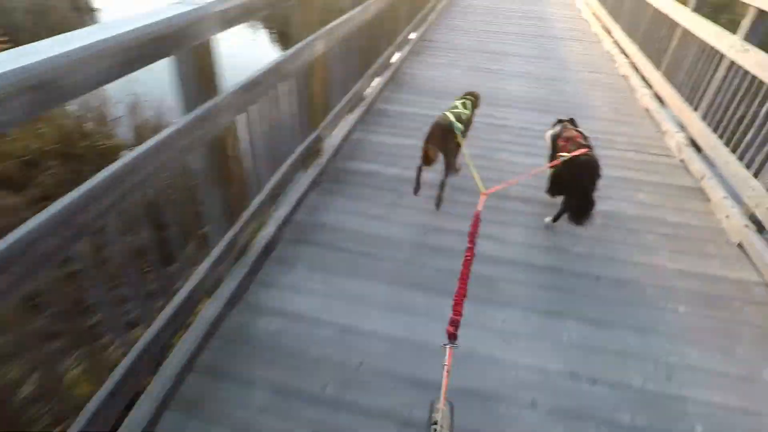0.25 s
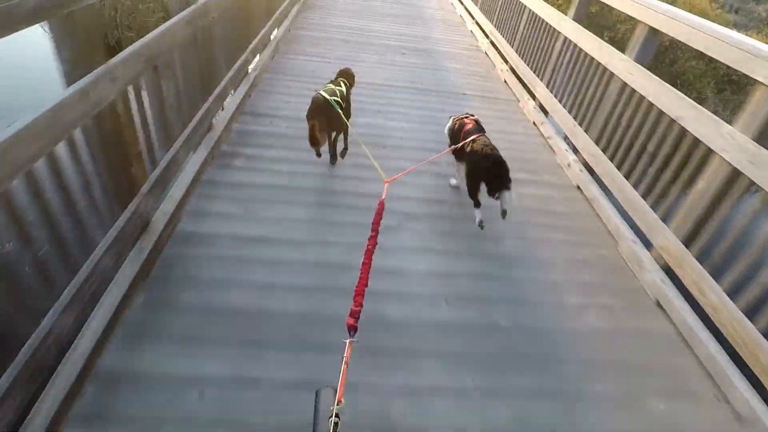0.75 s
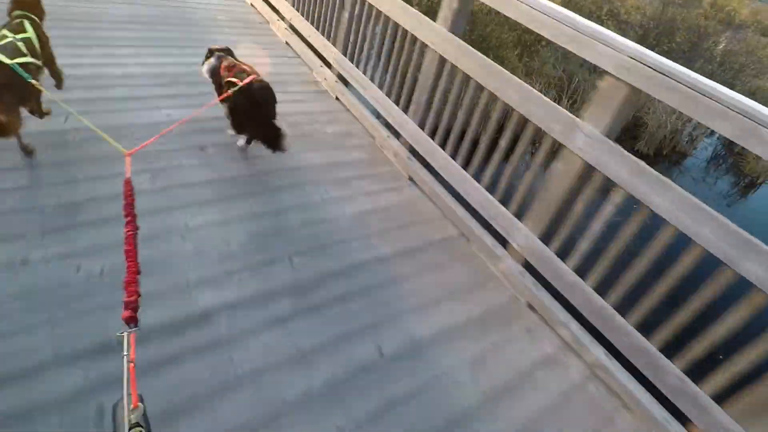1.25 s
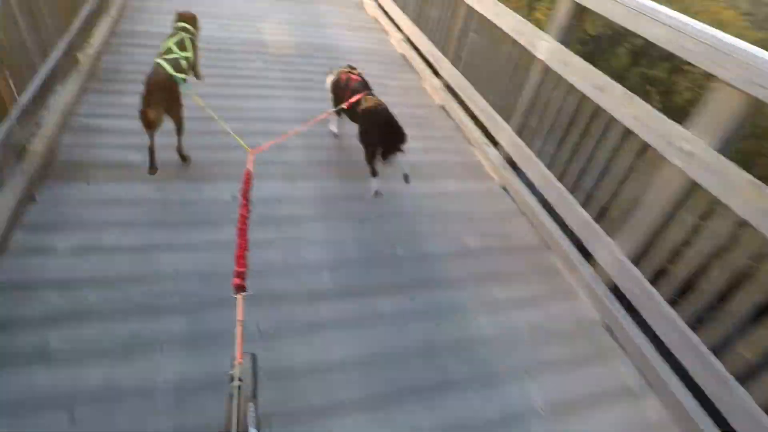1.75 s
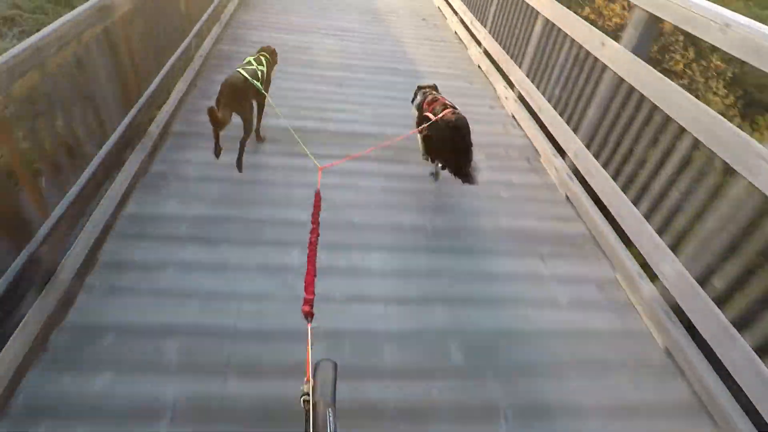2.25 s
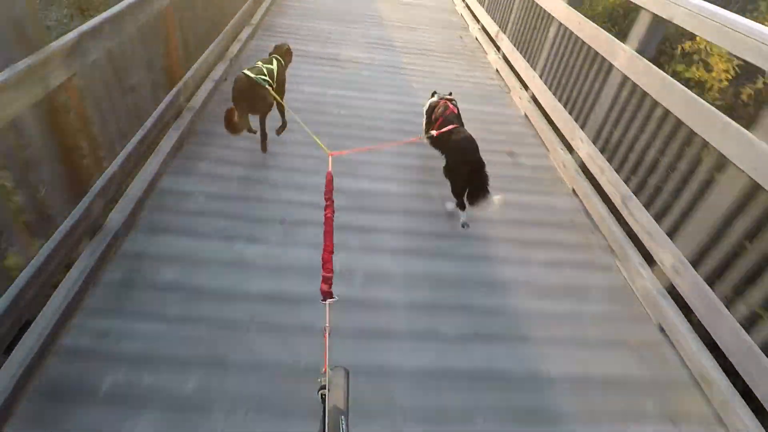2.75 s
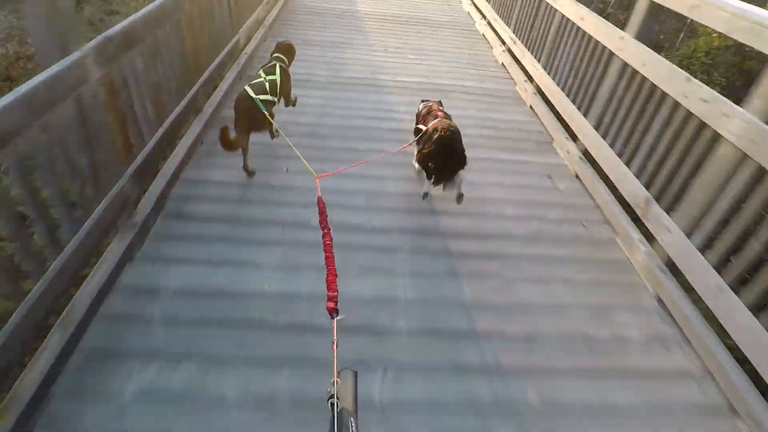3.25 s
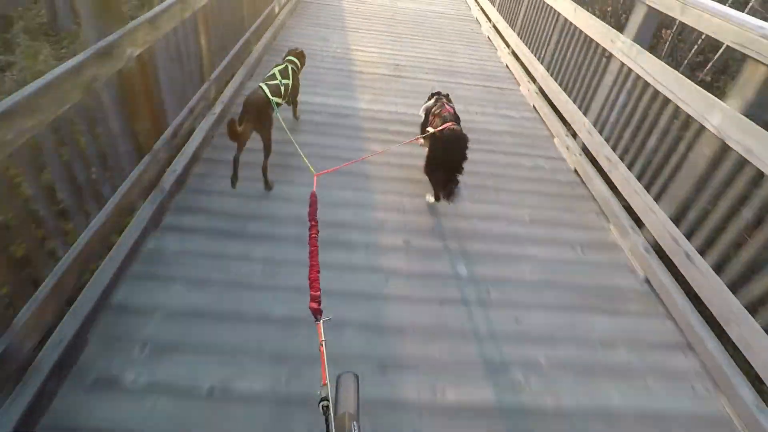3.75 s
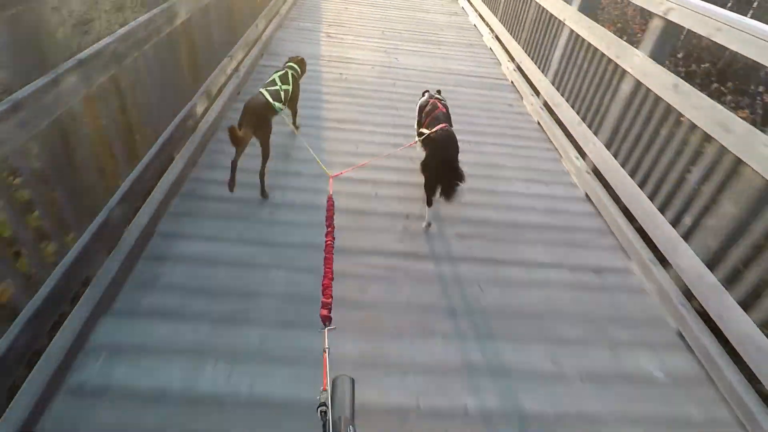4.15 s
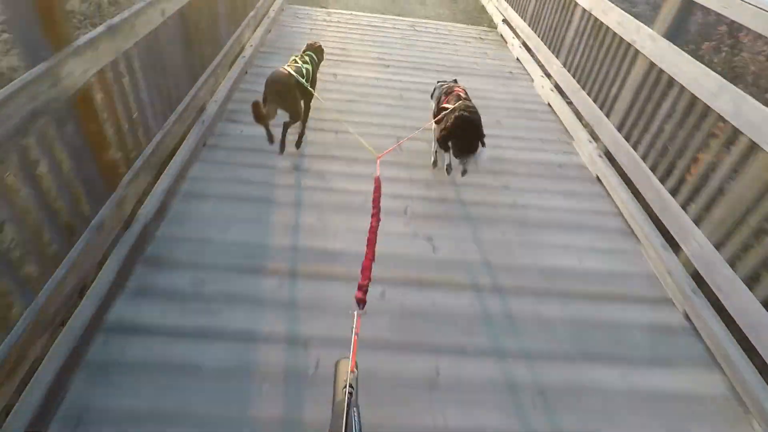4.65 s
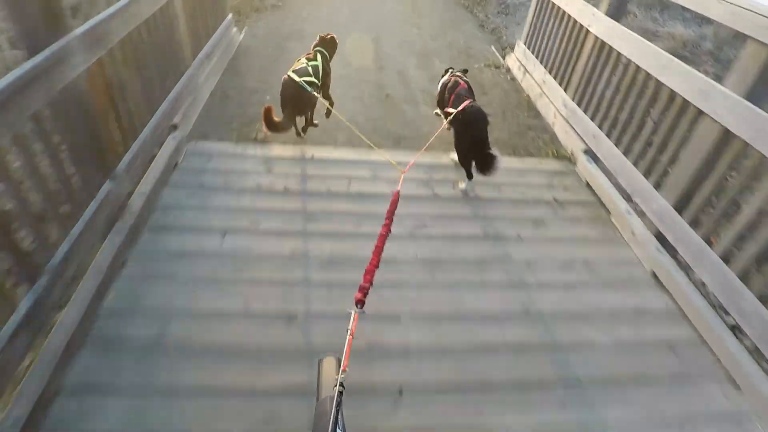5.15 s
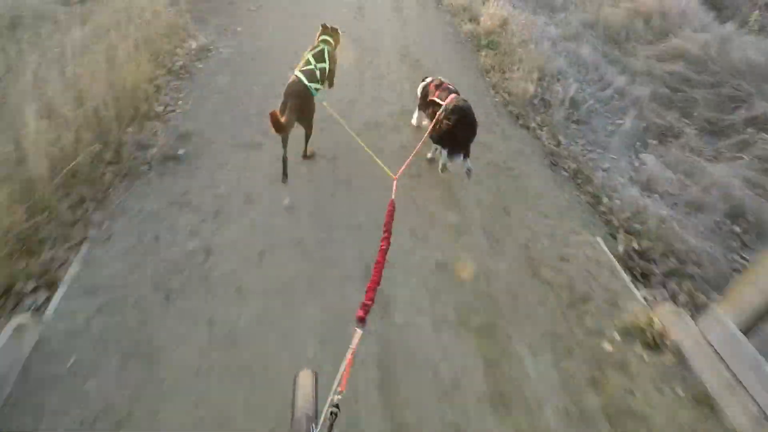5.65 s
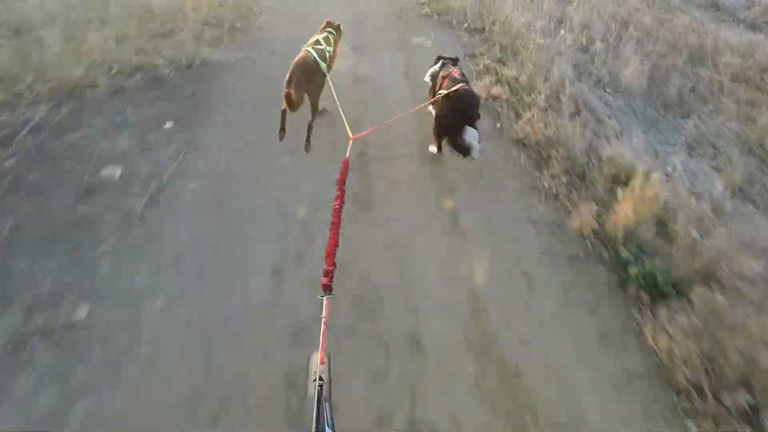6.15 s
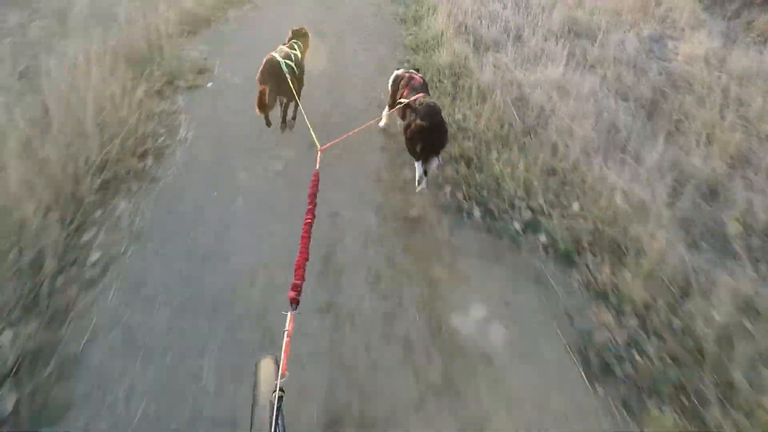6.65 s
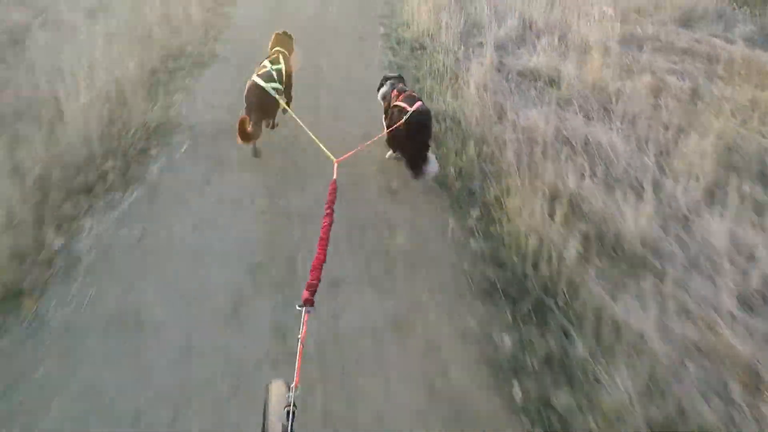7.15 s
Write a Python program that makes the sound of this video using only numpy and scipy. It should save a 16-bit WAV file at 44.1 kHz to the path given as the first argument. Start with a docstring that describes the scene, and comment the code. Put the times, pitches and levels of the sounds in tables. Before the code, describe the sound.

A wheeled ride pulled by two running dogs crosses a wooden bridge outdoors. Claws and frame tick and clatter over rough tyre hiss, and small metal collar tags jingle at each stride. After half a second, loud wind rumbles and slaps the rider-worn microphone, easing briefly between about 1.2 and 1.7 seconds, then staying heavy. Near the end the wheels reach dirt, where the hiss is smoother and ticks become sparse.

```python
"""A scooter drawn by two running dogs, heard at a small microphone port on the rider.
At first the rider's head shelters the port: claws and frame tick on bridge planks as short noise bursts,
tyres and paws hiss as jolted noise, and two collar tags jingle as decaying modes.
From 0.5 s head wind rumbles and buffets as banded noise with sharp slaps, sheltered again at 1.2 to 1.7 s.
From 6.3 s the wheels run on a dirt trail, whose hiss is smoother, while wind and tags go on to the end."""
import sys
import numpy as np
from scipy import signal
from scipy.fft import rfft, irfft
from scipy.io import wavfile
from scipy.ndimage import uniform_filter1d

SR = 44100
rng = np.random.default_rng(int(sys.argv[2]) if len(sys.argv) > 2 else 0)


def magnitude_from_level(level_db):
    """Linear magnitude for a level in decibels (20 dB per decade)."""
    exponent = np.asarray(level_db, float) / 20
    return 10 ** exponent


def generate_wav(sig):
    """Save sig (samples, or channels by samples) to the path in sys.argv[1] as 16-bit PCM at SR."""
    pcm = np.round(np.clip(np.atleast_2d(sig).T, -1, 1) * 32767).astype(np.int16)
    wavfile.write(sys.argv[1], SR, pcm)


N = 326869
TIME = np.arange(N) / SR
HZ = np.fft.rfftfreq(N, 1 / SR) + 1  # offset by 1 Hz to allow logarithms


def on_hz(points, hz):
    """Logarithmic frequency axis: a (frequency [Hz], value) table is interpolated along it."""
    f, v = np.transpose(points)
    return np.interp(np.log(hz), np.log(f), v)


def curve(points):
    """Linear interpolation: a (time [s], value) table is joined by straight lines."""
    return np.interp(TIME, *np.transpose(points))


def unit(x):
    """Normalisation: the signal is scaled to rms 1."""
    return x / np.sqrt(np.mean(x ** 2))


def walk(rate):
    """Slow random modulation: levels held 1 / rate seconds and smoothed twice, with rms 1."""
    hold = max(int(SR / rate), 1)
    steps = np.repeat(rng.standard_normal(N // hold + 1), hold)
    return unit(uniform_filter1d(uniform_filter1d(steps, hold), hold)[:N])


def scatter(rate):
    """Poisson process: random moments, on average rate per second."""
    s = np.cumsum(rng.exponential(size=400)) / rate
    return s[s < N / SR]


def bursts(rate, spread_db, decay_s):
    """Shot noise: random kicks of uneven size, each rising fast and dying away."""
    size_db = np.minimum(spread_db * rng.exponential(size=N), 14)
    kicks = (rng.random(N) < rate / SR) * magnitude_from_level(size_db)
    t = TIME[:int(6 * decay_s * SR)]
    pulse = (1 - np.exp(-4 * t / decay_s)) * np.exp(-t / decay_s)
    return np.convolve(kicks, pulse)[:N]


def add(out, s, sound):
    """Superposition: a sound is mixed in from time s on."""
    i = int(s * SR)
    out[i:i + len(sound)] += sound[:N - i]


def eddies(points, drive, shared, own_db, own_rate):
    """Turbulent spectrum: half-octave bands of a drive flicker alone, then share one gain; rms 1."""
    spectrum = rfft(drive) * magnitude_from_level(on_hz(points, HZ))
    lowest, highest = points[0][0], points[-1][0]
    spectrum[(HZ < lowest) | (HZ > highest)] = 0
    out = 0
    for octave in np.arange(np.log2(lowest), np.log2(highest) + .5, .5):
        band = np.clip(1 - 2 * np.abs(np.log2(HZ) - octave), 0, 1)
        out = out + irfft(spectrum * band, N) * magnitude_from_level(own_db * walk(own_rate))
    return unit(out * shared)


# Modes of the two metal tags: (frequency [Hz], relative level [dB], T60 [s])
SMALL_TAG_MODES = [(5890, -9, .22), (5945, -11, .15), (6110, -12, .15), (6170, -10, .22), (6280, -14, .15),
                   (8710, -29, .1), (9187, -26, .12)]
BIG_TAG_MODES = [(3607, -16, .15), (3693, -13, .25), (4000, -15, .15), (6508, -6, .2), (6675, -8, .2),
                 (6770, -13, .1), (7338, -16, .17), (7410, -20, .12), (7520, -26, .1), (9820, -24, .2),
                 (9950, -25, .15), (10683, -23, .16)]
# Blows on the small tag, mostly one a stride: (time [s], nominal level [dB])
SMALL_TAG_BLOWS = [(0.7455, -33.5), (1.137, -33), (1.529, -34.5), (1.933, -36), (2.3306, -33.5),
                   (2.725, -34), (3.1132, -38), (3.5155, -33), (3.9073, -42.5), (4.299, -38.5),
                   (4.694, -36.5), (5.078, -35.5), (5.4688, -37), (5.8246, -41), (6.2467, -40), (6.84, -48),
                   (7.0498, -39.5)]
# Separate blows on the big tag, hard and soft: (time [s], nominal level [dB])
BIG_TAG_BLOWS = [(0.105, -45.5), (0.162, -37.5), (0.335, -46.5), (0.5297, -50.5), (0.58, -48),
                 (0.64, -46.5), (1.1812, -48.5), (1.5193, -44), (1.7636, -43), (1.854, -43.5),
                 (2.2303, -46), (2.9328, -44.5), (3.0776, -50), (3.5538, -41.5), (3.9688, -48.5),
                 (4.4669, -43.5), (4.5235, -42.5), (5.1567, -49.5), (5.4967, -46.5), (5.606, -34.5),
                 (5.6595, -34.5), (5.7083, -39.5), (5.8247, -32), (5.9508, -37.5), (6.1242, -41.5),
                 (6.209, -50), (6.2736, -44), (7.0, -47), (7.1703, -51.5)]


def collar_tag(modes, hits, rattle_db, rattle_rate):
    """Modal vibration of a swinging metal disc: separate blows and random touches excite decaying modes."""
    out, t = np.zeros(N), TIME[:9000]
    touches = [(s, rattle_db - 2.9 * rng.exponential()) for s in scatter(rattle_rate)]
    blows = list(hits) + touches
    chance = rng.standard_normal((len(blows), 2 * len(modes)))
    rings = [magnitude_from_level(db) * np.exp(2j * np.pi * hz * t - np.log(1000) * t / t60) for hz, db, t60 in modes]
    is_highest = np.array(modes)[:, 0] > 9000
    onset = 1 - np.exp(-t / 0.003)
    for (s, db), c in zip(blows, chance):
        # harder blows favour the highest modes
        bright_db = is_highest * 1.2 * (db + 42)
        # each blow shares out among the modes anew, in level and phase
        weights = magnitude_from_level(db + bright_db + 2.4 * c[::2]) * np.exp(3j * c[1::2])
        # and shifts them all by a few Hz
        shift = np.exp(2j * np.pi * 12.0 * c[0] * t)
        add(out, s, np.imag(weights @ rings * shift) * onset)
    brushing = magnitude_from_level(3 * walk(90))  # it turns and brushes the fur as it rings
    return out * brushing


# Hiss spectrum of tyres and paws: (frequency [Hz], relative density [dB per Hz])
ROLLING_SPECTRUM = [(500, 5), (800, -3), (1100, -4), (2700, -7.5), (3400, -13), (4200, -9.5), (5500, -16.5),
                    (6500, -17.5), (6850, -37), (7000, -43.5), (7800, -57.5)]
# How hard tyres and paws work the ground: (time [s], rms level before the housing [dB])
ROLLING_LEVEL = [(0, -39.5), (0.35, -37.5), (0.6, -39), (1.1, -40.5), (1.25, -42), (1.45, -43.5),
                 (1.7, -40.5), (4.5, -40), (4.75, -41.5), (5.1, -40.5), (5.6, -44), (5.75, -45), (6.1, -45),
                 (6.4, -39.5), (7.41, -41)]
BRIDGE_ENDS_S, DIRT_SHARE = 6.3, 0.32  # soft dirt jolts and crackles less than planks


def rolling():
    """Rolling-contact noise: tyre and paw hiss, jolted by plank gaps, with a crackle of grit on top."""
    hard = np.where(TIME < BRIDGE_ENDS_S, 1, DIRT_SHARE)
    jolts = magnitude_from_level(hard * (0.34 * walk(25) + 2.0 * walk(90)))
    crackle = 1 + 0.6 * hard * bursts(110, 5.5, 0.001)
    hiss = eddies(ROLLING_SPECTRUM, rng.standard_normal(N), jolts * crackle, 1.5, 30)
    return hiss * magnitude_from_level(curve(ROLLING_LEVEL))


# Single ticks of claws and frame:
# (time [s], nominal peak [dB], pitch [Hz], treble relative to that peak [dB])
PLACED_TICKS = [(0.0154, -23.5, 3980, -28), (0.1028, -20, 2120, -29), (0.1717, -22.5, 2410, -19),
                (0.2643, -33, 4080, -16), (0.2803, -27.5, 2380, -16.5), (0.29, -21.5, 2120, -22),
                (0.4283, -16, 2230, -35.5), (0.5074, -21, 2400, -27), (0.578, -22.5, 2800, -25),
                (0.601, -20.5, 2000, -23), (0.6234, -20, 2220, -25), (0.7474, -26, 2180, -16),
                (0.908, -30, 3800, -23), (1.008, -24, 2020, -37), (1.021, -28, 4200, -25),
                (1.1337, -25.5, 2190, -4), (1.264, -43, 2400, -14), (1.2985, -24.5, 4700, -11),
                (1.316, -36, 3000, -8), (1.365, -26, 2800, -16), (1.457, -31.5, 3030, -13),
                (1.5333, -26, 4350, -19), (1.545, -31.5, 4600, -16), (1.6597, -26, 2600, -18.5),
                (1.69, -32, 4000, -17), (1.718, -31.5, 2160, -14), (1.8557, -28, 4180, -16.5),
                (1.906, -19, 2050, -28.5), (2.0043, -29, 4170, -21), (2.0966, -30.5, 4060, -23),
                (2.2436, -20, 4280, -34), (2.357, -34, 2020, -11), (2.5596, -24, 2750, -16),
                (2.717, -25, 4100, -18), (2.8783, -22.5, 2120, -24), (2.9377, -27.5, 3880, -13),
                (2.953, -26, 4700, -12), (3.0734, -34, 2380, -7.5), (3.272, -24, 2340, -30),
                (3.3423, -23.5, 4230, -20), (3.4414, -20.5, 2180, -24), (3.5159, -23.5, 2380, -17),
                (3.5823, -22.5, 4300, -34), (3.7364, -21.5, 2140, -25.5), (3.7935, -29, 2000, -5.5),
                (3.8315, -20, 1960, -32), (3.909, -26, 4260, -14), (4.0133, -31.5, 4290, -20),
                (4.129, -24.5, 2320, -29.5), (4.2218, -21.5, 2180, -24), (4.5206, -26.5, 2050, -3),
                (4.6295, -19.5, 4470, -39), (4.6977, -28, 2100, -22.5), (4.8244, -22, 2010, -22),
                (4.911, -23, 2010, -22.5), (4.9477, -30, 4380, -25), (5.16, -28.5, 4300, -18),
                (5.21, -37.5, 4400, -21), (5.48, -31.5, 4400, -9), (5.5293, -31.5, 4400, -18),
                (5.5927, -32.5, 2450, -7), (5.604, -29, 3760, -9.5), (5.766, -33.5, 4800, -5),
                (6.188, -37.5, 4600, -17.5), (6.2103, -34, 4420, -16.5), (6.2487, -29, 3980, -21),
                (7.0828, -30.5, 4340, -19)]
# The faint tick strewn at random: (nominal peak [dB], pitch [Hz], relative treble [dB])
FAINT_TICK_SOUND = (-36.5, 4800, -14.5)
FAINT_TICKS_PER_S = 1.4


def ticks():
    """Impact noise: each tick is a dry crack, filtered around its own pitch, with a short rattling tail."""
    out, t = np.zeros(N), TIME[:1300]
    rows = PLACED_TICKS + [(s, *FAINT_TICK_SOUND) for s in scatter(FAINT_TICKS_PER_S)]
    cracks = rng.standard_normal((len(rows), len(t)))
    wide = signal.butter(2, [1800, 5000], "band", fs=SR, output="sos")
    high = signal.butter(4, [5000, 6800], "band", fs=SR, output="sos")
    tail = .2 * np.exp(-t / .007)
    fade = (1 - np.exp(-t / .001)) * (np.exp(-t / .0022) + tail)
    for (s, db, hz, treble_db), crack in zip(rows, cracks * fade):
        wood = signal.butter(1, [.92 * hz, 1.08 * hz], "band", fs=SR, output="sos")
        parts = [signal.sosfilt(band, crack) for band in (wide, wood, high)]
        wide_part, wood_part, high_part = (p / np.abs(p).max() for p in parts)
        tick = 0.34 * wide_part + 0.57 * wood_part + magnitude_from_level(treble_db) * high_part
        add(out, s, magnitude_from_level(db) * tick)
    return out


# Deep shudder of the ride: (frequency [Hz], relative density [dB per Hz])
SHUDDER_SPECTRUM = [(20, -2.5), (30, -9.5), (50, -6.5), (90, -15.5)]


def shudder():
    """Low-frequency random vibration: the ride shakes the port, sheltered or not."""
    return eddies(SHUDDER_SPECTRUM, rng.standard_normal(N), 1, 1.9, 8.7) * magnitude_from_level(-28)


# Strength of the head wind: (time [s], gust [dB])
GUST_CURVE = [(0.0, -3.5), (0.18, 4.5), (0.3, 1.5), (0.38, 8.5), (0.47, 4.5), (0.54, 6), (0.62, 2.5),
              (0.7, 1), (0.79, 1), (0.825, -3), (0.87, 2), (0.93, 0.5), (1.09, 3), (1.26, -4), (1.38, -0.5),
              (1.46, 0.5), (1.53, 3.5), (1.65, -2.5), (1.8, 1.5), (1.96, 0.5), (2.15, -1), (2.3, 0.5),
              (2.37, -0.5), (2.47, -1), (2.6, -2.5), (2.7, -2.5), (2.82, -0.5), (2.87, 2), (2.93, 1),
              (3.17, 1.5), (3.25, 1), (3.35, 3), (3.45, -0.5), (3.66, -2), (3.85, -0.5), (4.0, 1), (4.1, 0),
              (4.14, 3), (4.21, -2), (4.3, 2), (4.42, -3), (4.54, 1.5), (4.71, -1.5), (4.8, -0.5), (4.9, 0),
              (5.0, -1.5), (5.18, -1), (5.33, 1.5), (5.49, 1.5), (5.57, -0.5), (5.7, -2), (5.82, -2.5),
              (5.88, 1), (5.95, -3), (6.02, -2), (6.15, -0.5), (6.27, 0), (6.45, 3), (6.6, 1), (6.75, 0),
              (6.9, 3), (7.2, 1.5), (7.41, 1)]
# Slow heave of the large eddies over the gust: (time [s], level [dB])
HEAVE_CURVE = [(0, 1), (.08, -3), (.17, 1), (.3, -0.5), (.39, 1.5), (.46, 1.5), (.56, -0.5), (.68, 1),
               (.8, -0.5), (.88, 1), (.95, -2), (1.06, 0.5), (1.16, -2), (1.26, -2), (1.37, 1.5),
               (1.42, -1), (1.53, 0.5), (1.65, -0.5), (1.8, -1), (2.02, 3), (2.37, 0.5), (2.6, -1),
               (2.75, 0), (2.88, 0.5), (3.02, -4.5), (3.14, -0.5), (3.4, -0.5), (3.8, 1.5), (4.1, 0.5),
               (4.4, 1), (4.7, 1.5), (4.82, -2), (5.15, 1), (5.45, -2), (5.6, 1), (5.82, -0.5), (5.89, 0),
               (6.08, -0.5), (6.14, 2), (6.25, -1.5), (6.32, -0.5), (6.7, 0), (7.1, -1), (7.41, -0.5)]
# The rider's head turns and shelters the port: (start [s], end [s])
SHELTER_SPANS = [(-0.5, 0.498), (1.155, 1.718)]
TURN_AWAY_S, TURN_BACK_S = 0.041, 0.032
# How each wind layer follows the wind:
# (base level in the open [dB], slope [dB per dB of gust], drop in shelter [dB], random swell [dB])
DEEP_RESPONSE = (-18, 0.79, 7.5, 0)
RUMBLE_RESPONSE = (-19, 0.5, 9, 1.0)
BUFFET_RESPONSE = (-22.5, 0.89, 25.5, 0.78)
EDGE_RESPONSE = (-36.5, 1.5, 21, 1.16)
SWELL_PER_S = 22


def wind_levels():
    """Common modulation: one gust, swell and head shelter set all layers; the large eddies heave too."""
    shelter = 0
    for start, end in SHELTER_SPANS:
        turned_away = .5 + .5 * np.tanh((TIME - start) / TURN_AWAY_S)
        not_yet_back = .5 + .5 * np.tanh((end - TIME) / TURN_BACK_S)
        shelter = shelter + turned_away * not_yet_back
    gust, swell, heave = curve(GUST_CURVE), walk(SWELL_PER_S), curve(HEAVE_CURVE)
    responses = (DEEP_RESPONSE, RUMBLE_RESPONSE, BUFFET_RESPONSE, EDGE_RESPONSE)
    deep, rumble, buffet, edge = (open_db + slope * gust - drop_db * shelter + swell_db * swell
                                  for open_db, slope, drop_db, swell_db in responses)
    return deep + heave, rumble + heave, buffet, edge


# Sudden slaps of air on the port: (onset time [s], nominal peak [dB])
AIR_SLAPS = [(0.526, -7), (0.623, -12.5), (0.699, -13), (0.85, -8), (0.867, -10), (0.951, -6.5),
             (1.005, -10.5), (1.03, -13.5), (1.056, -9), (1.768, -15), (1.784, -11.5), (1.846, -10.5),
             (1.921, -7.5), (2.017, -15.5), (2.116, -11.5), (2.184, -9.5), (2.267, -12.5), (2.291, -10.5),
             (2.423, -15), (2.614, -13.5), (2.664, -7.5), (2.773, -13), (2.796, -12), (2.831, -12),
             (2.881, -9.5), (2.961, -9), (2.982, -11), (3.037, -9.5), (3.136, -12), (3.219, -12.5),
             (3.283, -10), (3.401, -9.5), (3.535, -15), (3.637, -12), (3.694, -13.5), (3.824, -11),
             (3.895, -9), (3.96, -13), (4.018, -11), (4.114, -10), (4.183, -11), (4.244, -8), (4.303, -9),
             (4.498, -11), (4.596, -10.5), (4.763, -13), (4.997, -7), (5.035, -13.5), (5.107, -9.5),
             (5.169, -11), (5.454, -10.5), (5.603, -13), (5.685, -12.5), (5.861, -11.5), (5.897, -8),
             (5.964, -7.5), (6.061, -11.5), (6.382, -12), (6.472, -8.5), (6.513, -9.5), (6.936, -12)]
SPIKE_SHARE, SPIKE_WIDTH_S = 0.88, 0.00038  # part of a slap's peak that is the opening spike; its width
WAKE_RISE_S, WAKE_S = 0.00046, 0.004  # rise and decay of the stirred wake
WAKE_EVEN_DB = -6.5  # a slap of this peak has a wake gain equal to the gust gain, before rise and decay
SLACK_DB, SLACK_S = 8, .005  # the buffeting slackens just before a slap


def slaps():
    """Pressure transients: gives the opening spikes, and the gain of the slack and wake around them."""
    spikes, stirring = np.zeros(N), np.ones(N)
    u = TIME[:int(8 * SPIKE_WIDTH_S * SR)] / SPIKE_WIDTH_S - 4
    spike = (1 - u ** 2) * np.exp(-u ** 2 / 2)
    for s, db in AIR_SLAPS:
        add(spikes, s, SPIKE_SHARE * magnitude_from_level(db) * spike)
        after = np.clip(TIME - s, 0, 1)
        slack = magnitude_from_level(-SLACK_DB * (TIME < s) * np.exp(-((TIME - s) / SLACK_S) ** 2))
        wake = magnitude_from_level(db - WAKE_EVEN_DB) * (1 - np.exp(-after / WAKE_RISE_S)) * np.exp(-after / WAKE_S)
        stirring = stirring * slack * (1 + wake)
    return spikes, stirring


# Spectra of the wind layers, low to high: (frequency [Hz], relative density [dB per Hz])
DEEP_SPECTRUM = [(20, -5.5), (30, -14), (45, -16), (65, -5.5), (100, -0.5), (150, -2), (200, -4.5),
                 (280, -17)]
RUMBLE_SPECTRUM = [(110, -25), (150, -11.5), (210, -1.5), (300, -4.5), (380, -11), (600, -23.5)]
BUFFET_SPECTRUM = [(200, -18.5), (300, -4.5), (400, -2.5), (700, -4.5), (1000, -9.5), (1300, -18.5),
                   (1700, -36.5)]
EDGE_SPECTRUM = [(900, -16), (1200, -1.5), (1600, -4.5), (2000, -10), (2600, -18), (3300, -32),
                 (4500, -20.5)]
# Short lulls in the buffeting: (time [s], depth [dB], length [s])
BUFFET_LULLS = [(2.412, 24, 0.028), (2.957, 10, 0.0095), (3.012, 23, 0.047), (3.1, 13.5, 0.027),
                (3.21, 5, 0.018), (3.233, 13, 0.014), (4.279, 8, 0.018), (4.476, 5, 0.028),
                (4.734, 6.5, 0.06), (5.834, 4.5, 0.049), (6.038, 5, 0.035)]
RUMBLE_LULL_SHARE = 0.12  # part of a lull's depth that reaches the rumble


def wind(deep_db, rumble_db, buffet_db, edge_db):
    """Turbulence at a port: large eddies boom and rumble, small ones patter as dense pressure kicks."""
    lull_db = sum(db * np.exp(-(2 * (TIME - s) / length) ** 4) for s, db, length in BUFFET_LULLS)
    spikes, stirring = slaps()
    gusts = magnitude_from_level(3.4 * np.tanh(0.18 * walk(70) + .4 * walk(200))) * stirring
    kicks = unit((rng.random(N) < 700 / SR) * rng.uniform(-1.02, 1, N))
    patter = kicks + 0.77 * rng.standard_normal(N)  # feeds mids and edge alike
    deep = eddies(DEEP_SPECTRUM, rng.standard_normal(N), 1, 0.9, 30) * magnitude_from_level(deep_db)
    rumble = eddies(RUMBLE_SPECTRUM, rng.standard_normal(N), 1, 0.6, 30)
    rumble = rumble * magnitude_from_level(rumble_db - RUMBLE_LULL_SHARE * lull_db)
    buffet = eddies(BUFFET_SPECTRUM, patter, gusts, 0.42, 50) * magnitude_from_level(buffet_db - lull_db)
    edge = eddies(EDGE_SPECTRUM, patter, gusts ** 1.47, 0.28, 60) * magnitude_from_level(edge_db - lull_db)
    return deep + rumble + buffet + edge + spikes


PORT_LIMIT = 1.4  # pressure at which the capsule saturates


def scene():
    """Superposition at one port: all sources add there, so both channels carry the same sound."""
    small_tag = collar_tag(SMALL_TAG_MODES, SMALL_TAG_BLOWS, -51, 16)
    big_tag = collar_tag(BIG_TAG_MODES, BIG_TAG_BLOWS, -50, 30)
    # the housing dulls the broad sounds
    muffle = signal.ellip(8, .5, 75, 6900, fs=SR, output="sos")
    cracks = ticks()
    # a little of the ticks stays undulled
    ground = signal.sosfilt(muffle, rolling() + cracks) + magnitude_from_level(-25.5) * cracks
    pressure = wind(*wind_levels()) + shudder()
    air = PORT_LIMIT * np.tanh(pressure / PORT_LIMIT)
    mono = signal.sosfilt(muffle, air) + ground + small_tag + big_tag
    return np.array([mono, mono])


# Channel balance: (frequency [Hz], left minus right [dB])
CHANNEL_BALANCE = [(150, 0), (300, -.06), (490, -.2), (830, -.9), (1400, -1.7), (2400, -1.3), (7000, -1.3),
                   (9000, 0)]


def balance(dry):
    """Interchannel level difference: the right channel is a little brighter."""
    tilt_db = on_hz(CHANNEL_BALANCE, HZ) * np.array([[.5], [-.5]])
    return irfft(rfft(dry) * magnitude_from_level(tilt_db), N)


def low_pass(x):
    """Removes everything above the highest recorded frequency."""
    return signal.sosfilt(signal.butter(12, 10800, fs=SR, output="sos"), x)


def record(dry):
    """Signal chain: the stereo pair is balanced left to right, then passed on."""
    mix = balance(dry)
    return low_pass(mix)


dry = scene()
out = record(dry)
generate_wav(out)
```